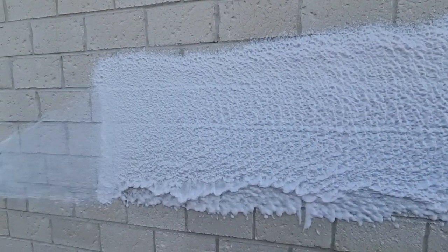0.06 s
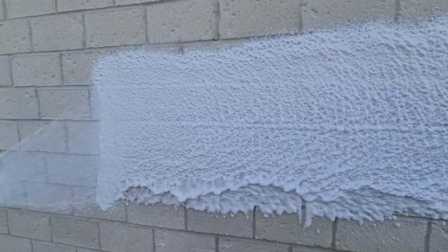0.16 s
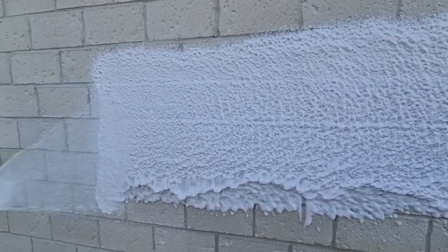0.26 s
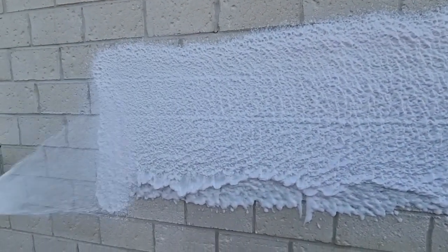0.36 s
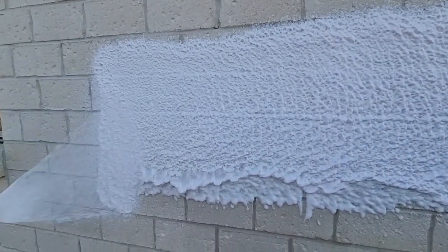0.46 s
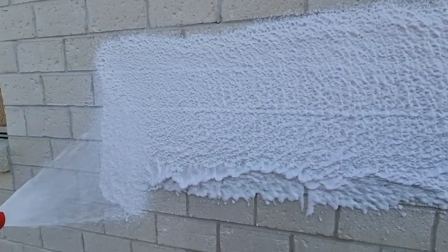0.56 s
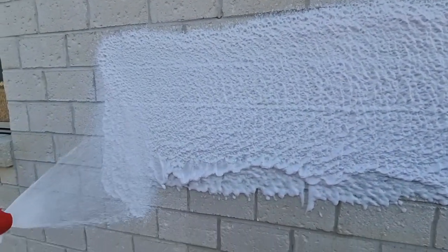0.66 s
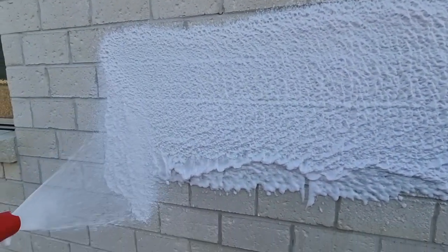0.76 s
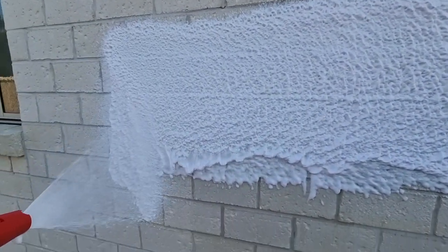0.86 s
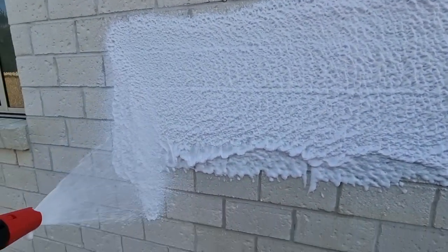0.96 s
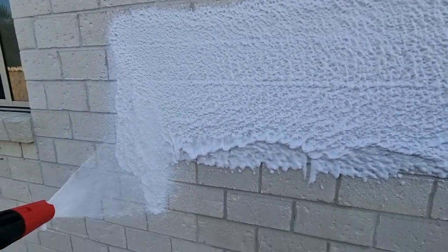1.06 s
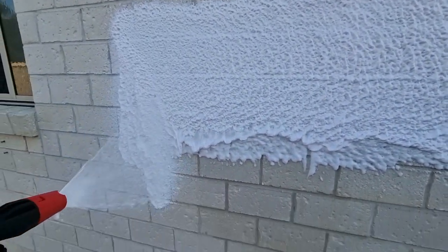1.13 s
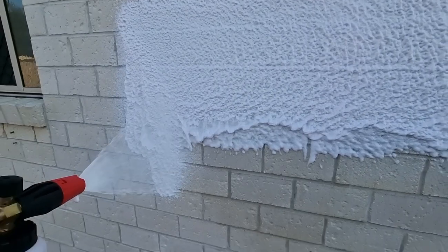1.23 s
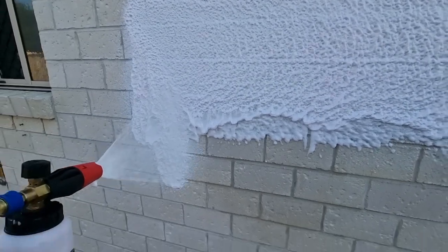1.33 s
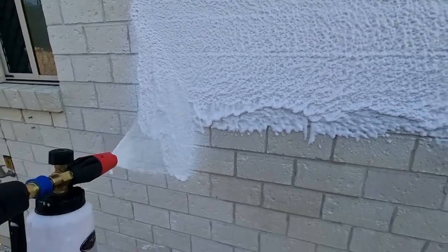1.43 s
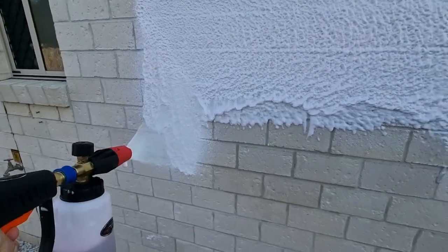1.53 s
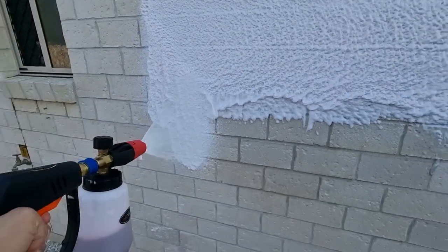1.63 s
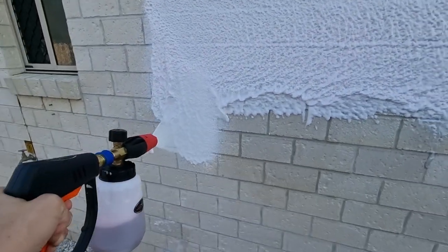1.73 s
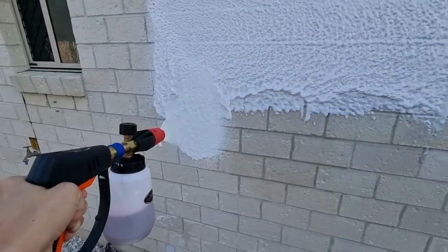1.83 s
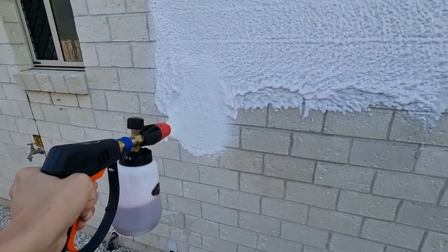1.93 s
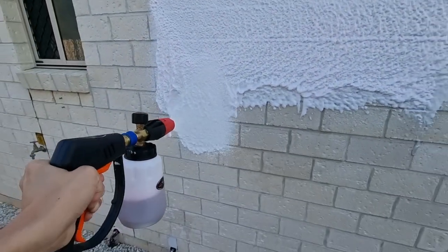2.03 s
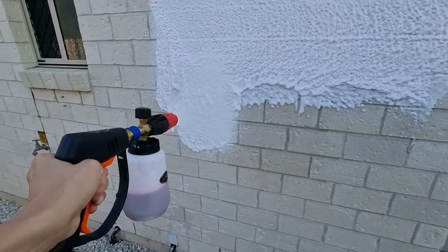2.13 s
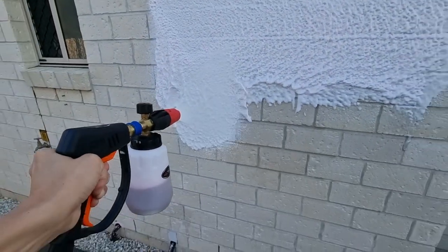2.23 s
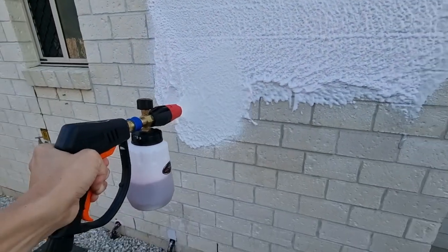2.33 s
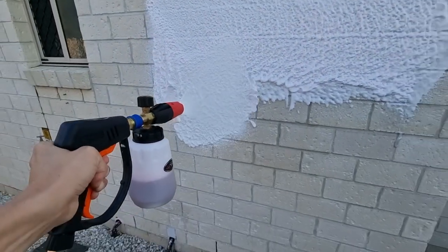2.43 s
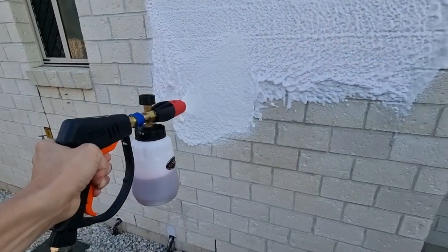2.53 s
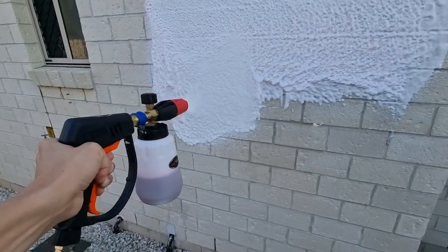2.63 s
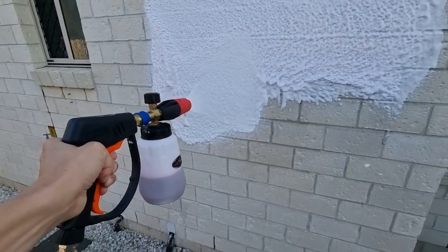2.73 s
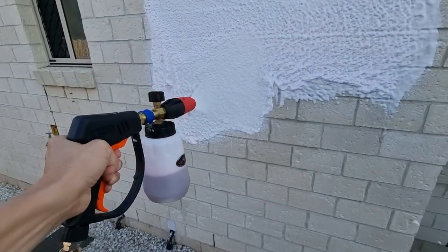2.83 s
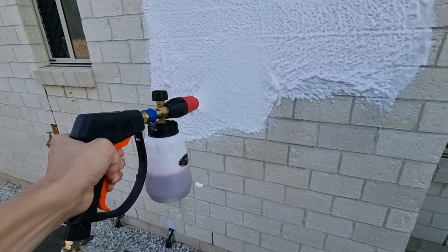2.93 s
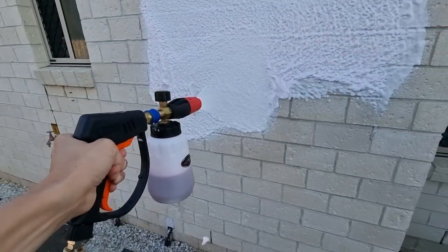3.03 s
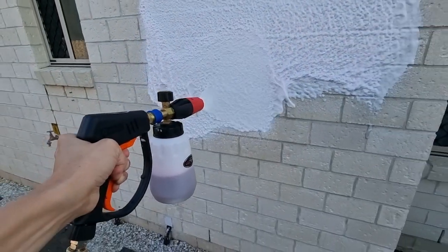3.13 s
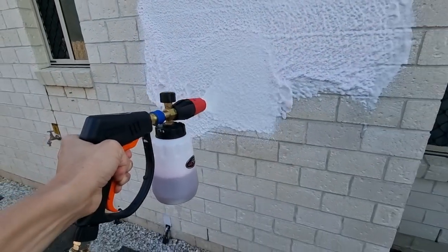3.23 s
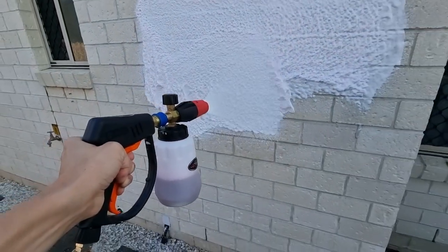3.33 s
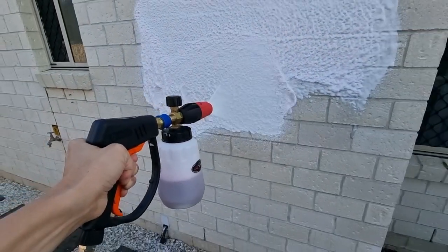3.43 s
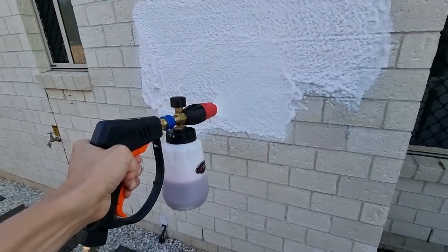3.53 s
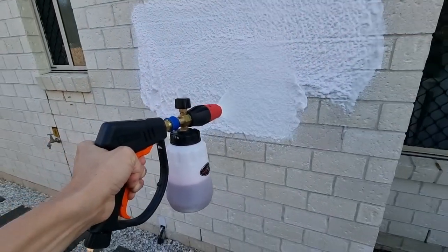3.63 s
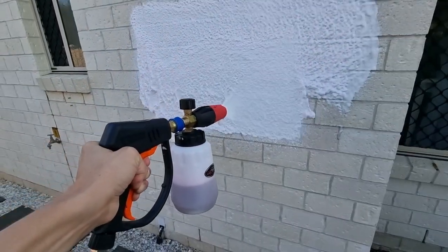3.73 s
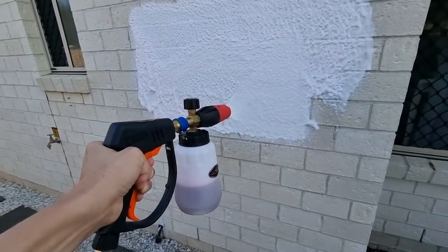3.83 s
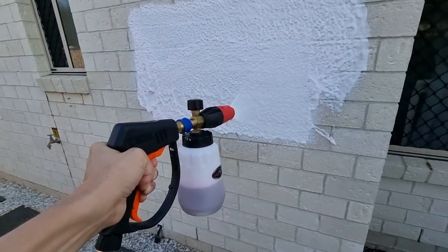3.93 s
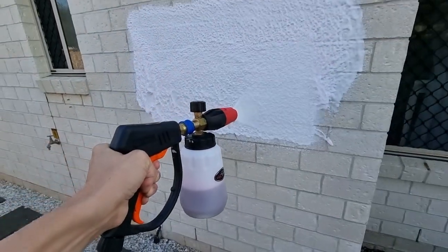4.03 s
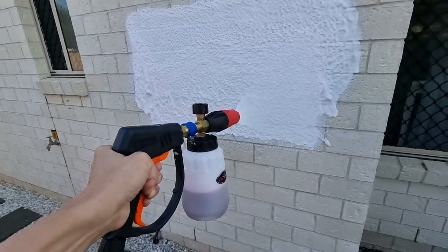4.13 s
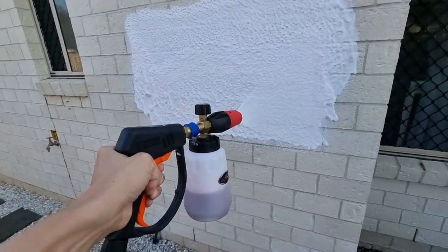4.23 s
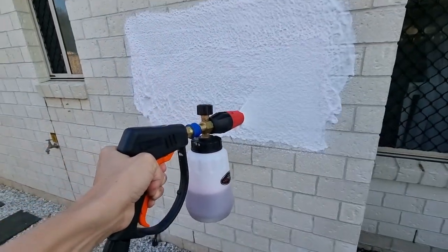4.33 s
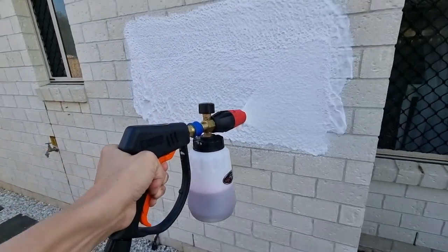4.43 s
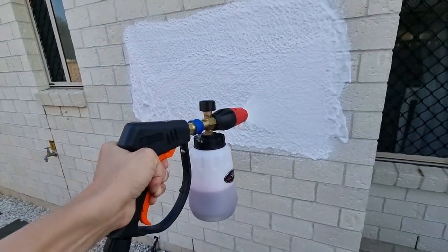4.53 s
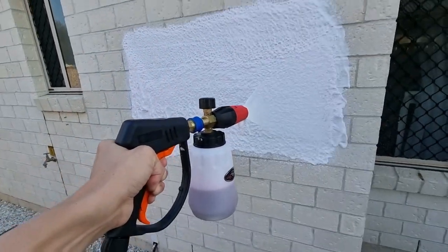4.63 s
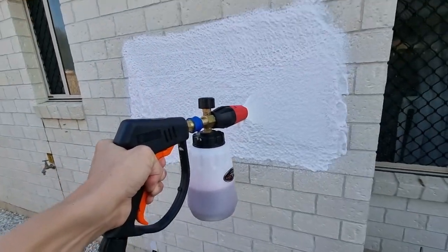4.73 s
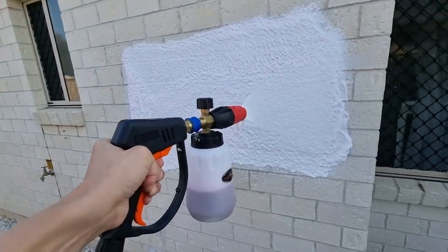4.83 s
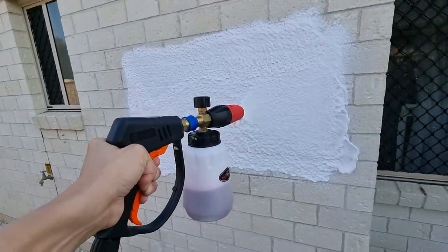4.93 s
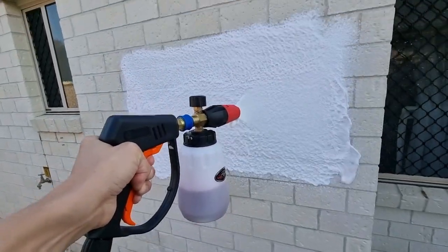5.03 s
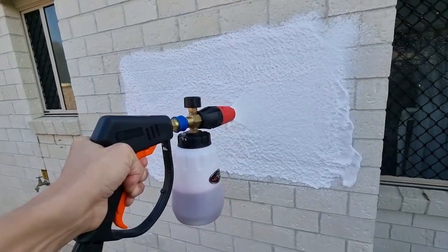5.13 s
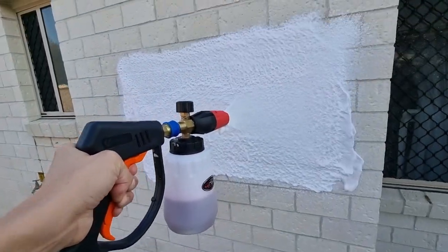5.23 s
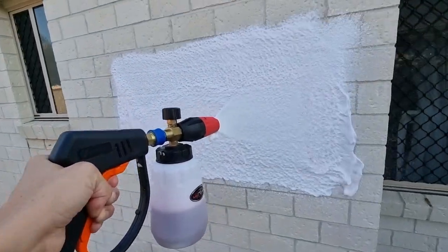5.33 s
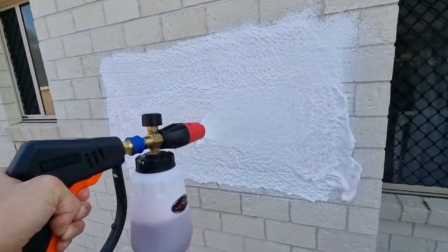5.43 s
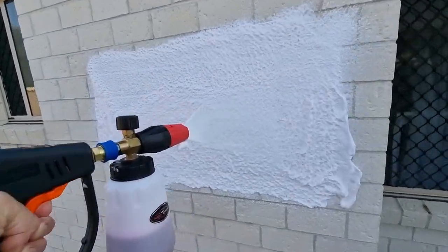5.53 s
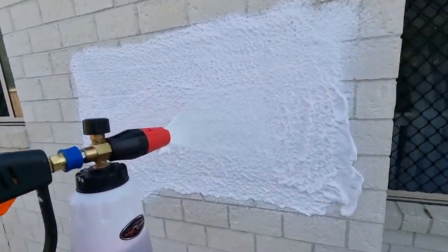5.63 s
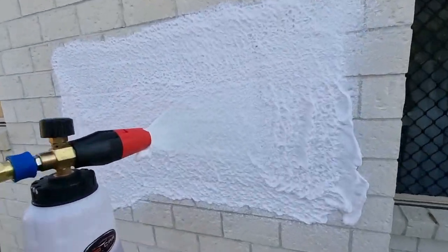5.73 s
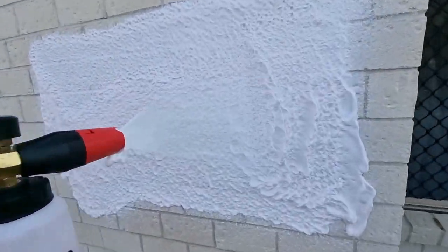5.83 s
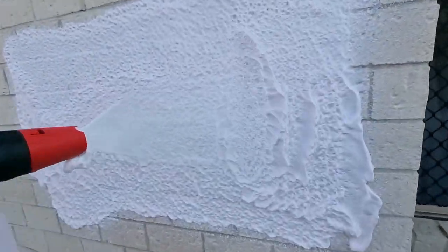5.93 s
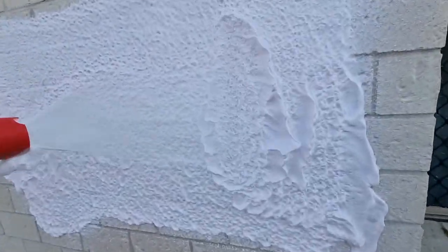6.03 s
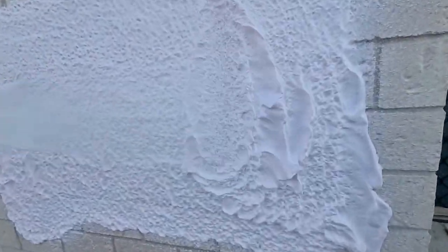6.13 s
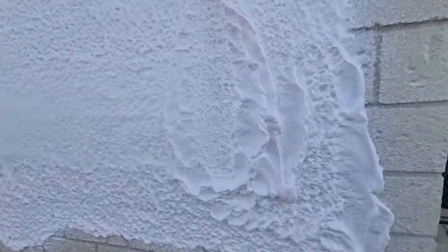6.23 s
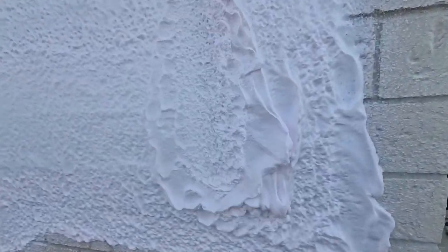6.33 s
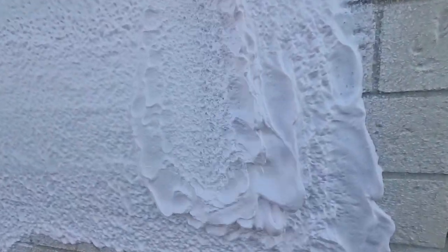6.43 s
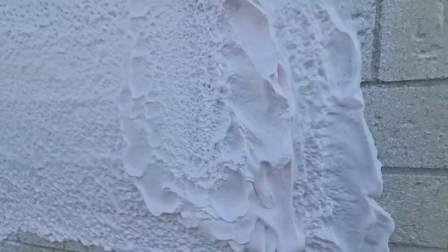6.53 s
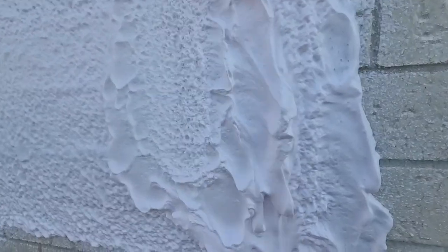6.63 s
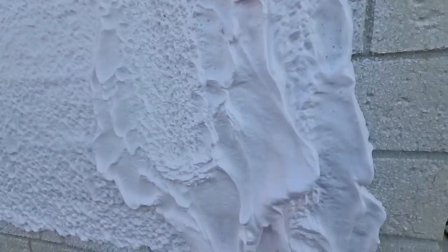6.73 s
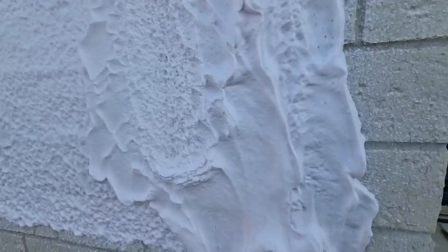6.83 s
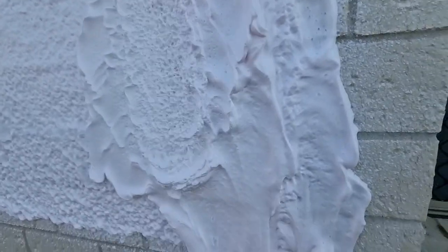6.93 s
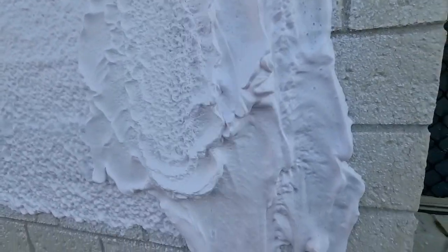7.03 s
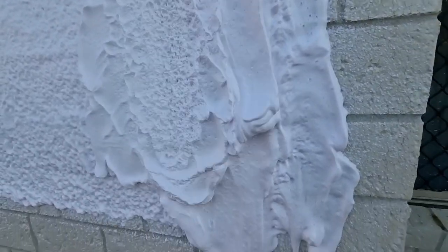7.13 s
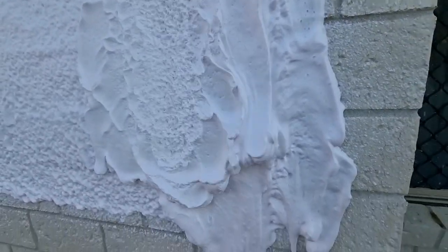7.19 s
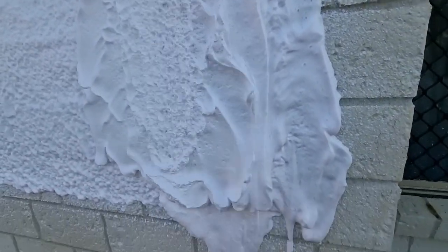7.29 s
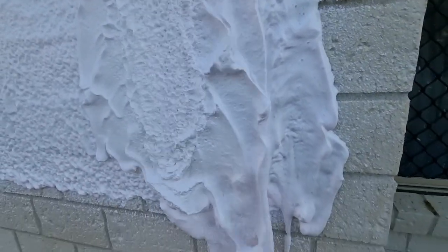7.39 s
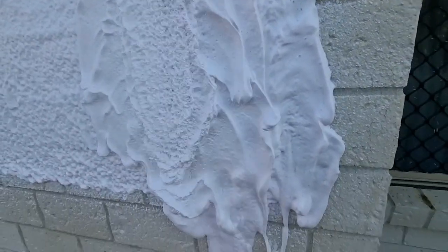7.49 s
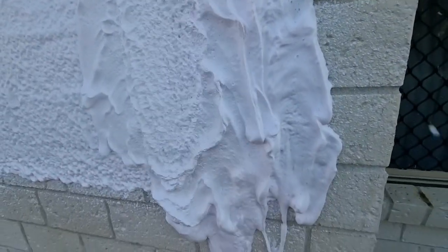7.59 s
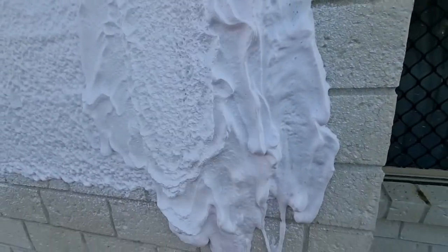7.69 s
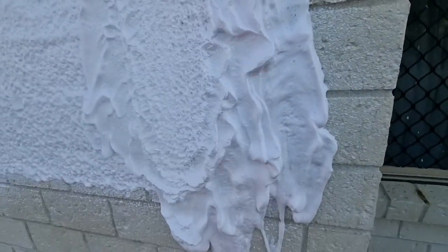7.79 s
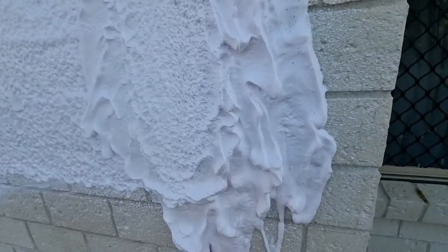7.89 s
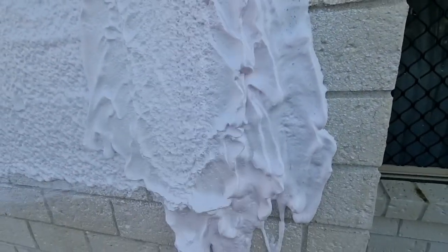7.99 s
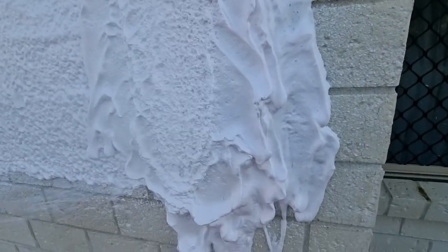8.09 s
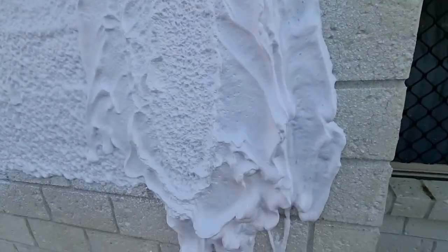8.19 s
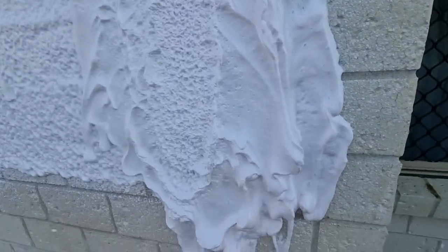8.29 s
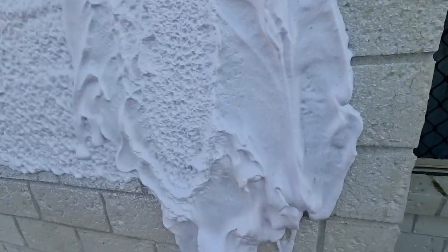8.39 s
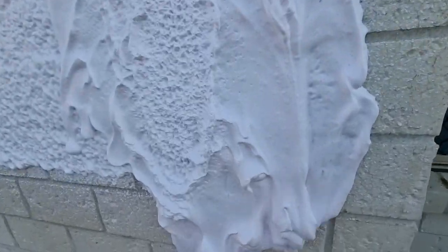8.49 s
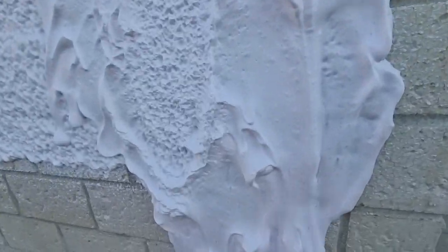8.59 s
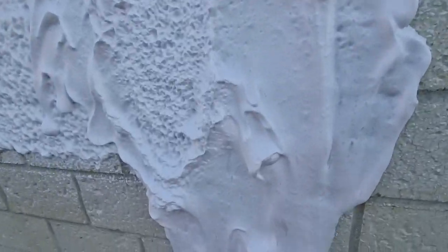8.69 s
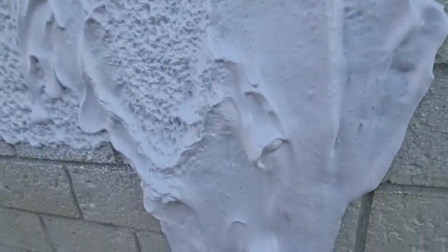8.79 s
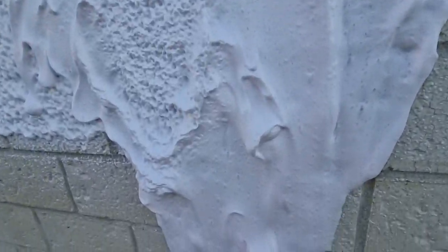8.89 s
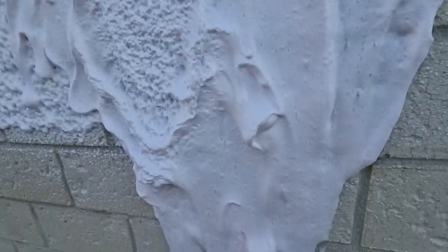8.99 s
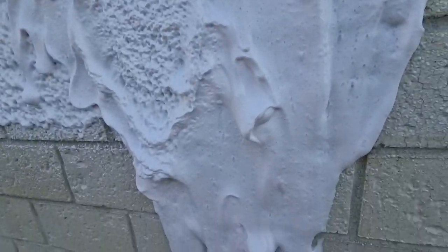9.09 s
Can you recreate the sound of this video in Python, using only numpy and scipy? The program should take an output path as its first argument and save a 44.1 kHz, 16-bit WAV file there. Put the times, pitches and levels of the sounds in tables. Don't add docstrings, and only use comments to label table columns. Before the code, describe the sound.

Close, steady roar and fizz of pressurised foam over a low pump hum stops abruptly, leaving a falling whine, a faint bird call and a click.

```python
import sys
import numpy as np
from scipy import signal
from scipy.fft import rfft, irfft, next_fast_len
from scipy.io import wavfile
from scipy.ndimage import uniform_filter1d, map_coordinates

SR = 44100
rng = np.random.default_rng(int(sys.argv[2]) if len(sys.argv) > 2 else 0)


def ratio_of_db(decibels):
    return 10 ** (np.asarray(decibels, float) / 20)


def persist_wave(psi):
    counts = np.round(np.clip(psi, -1, 1) * 32767).astype(np.int16)
    wavfile.write(sys.argv[1], SR, np.atleast_2d(counts).T)


N = 403515
TIME = np.arange(N) / SR

# (time [s], to the nozzle [dB], to the splash on the wall [dB])
NEARNESS = [(0, 1, -1), (.4, -0.5, 2.5), (.75, 2, 1.5), (1.25, 1, 1), (1.95, -0.5, -1.5), (2.5, -1.5, -1.5),
            (2.85, -2.5, -1), (3.4, -4, -1), (4.3, -2.5, -2), (5.0, -3, 0.5), (5.25, -5.5, -0.5),
            (5.55, -0.5, 3), (5.92, 3.5, 3.5), (6.17, 6.5, 5.5), (6.7, 5.5, 4.5), (7.5, 2.5, 5.5),
            (8.1, 2, 6), (8.26, 4.5, 7.5)]
# (time [s], left lead of the nozzle [samples], left lead of the splash [samples])
BEARING = [(0, 11.5, 6), (.8, 9, 5), (1.5, 5, 2.5), (1.9, 1.5, -2.5), (2.5, -.5, -2), (3.3, -3.5, -3),
           (4, -5, -4), (5, -5, -1), (5.5, -3.5, -2.5), (6, 3, 5), (6.3, 7, 8), (6.9, 10, 7),
           (7.2, 8.5, 8.5), (8.3, 7, 6)]
# (frequency [Hz], density [dB per Hz])
ROAR = [(150, -17.5), (260, -6.5), (350, -5), (430, -2), (600, 0), (900, 1), (1200, 0.5), (1500, 1),
        (1800, 2.5), (2200, -4), (3500, -17)]
# (frequency [Hz], density [dB per Hz])
FIZZ = [(1200, -11.5), (1900, -2.5), (2500, 0.5), (3200, 1), (4400, -2), (5400, -5), (6500, -4.5),
        (8000, -8), (9500, -9.5), (12000, -11)]
# (frequency [Hz], density [dB per Hz])
SIZZLE = [(8000, -16.5), (10300, -20.5), (11500, 1), (12500, 4.5), (14000, 3), (15000, 5), (15900, -0.5)]
# (time [s], lower resonance [Hz], upper resonance [Hz])
HOLLOW = [(0, 546, 1270), (1.22, 537, 1250), (1.34, 730, 1320), (2, 720, 1230), (2.75, 715, 1180),
          (2.95, 860, 1280), (4, 817, 1260), (5.2, 765, 1310), (5.45, 670, 1490), (5.9, 620, 1340),
          (6.15, 540, 1310), (7.2, 665, 1320), (8.3, 556, 1430)]
# (time [s], delay [ms])
WALL_ECHO = [(0, 1.45), (1.5, 1.47), (1.75, 1.27), (2.3, 1.04), (2.6, 1.01), (2.9, 1.09), (4.06, 1.12),
             (4.9, 1.155), (5.5, 1.25), (5.8, 1.46), (6.3, 1.36), (6.7, 1.45), (7.4, 1.41), (8.3, 1.47)]
# (decay t60 [s], echo level [dB], echo t60 [s])
JET_STOP = [
    (.11, -21, .4),
    (.125, -23, .6),
    (.13, -29, .7),
]
SHUT_S = 8.268
ROAR_DB, FIZZ_DB, SIZZLE_DB = -22.5, -19.5, -21.5
FIZZ_BY_NOZZLE, WALL_SHADES_FIZZ = 0.58, 0.056
ECHO_SHARE, ECHO_TOP_HZ = .14, 5000

# (multiple of the stroke rate [1], level [dB rms])
PUMP = [(2, -63.5), (3, -50.5), (4, -44.5), (6, -49)]
# (time [s], level [dB])
WASHER_NEARNESS = [(0, -3), (1.3, 3.5), (2, 2), (4.6, -0.5), (5.6, -4.5), (8.3, -5)]
# (frequency [Hz], width [Hz], level [dB])
SHELL = [(4550, 600, -.5), (5200, 800, -7), (6600, 700, -4)]
# (multiple of the whine [1], level [dB])
COAST_ORDERS = [(1.5, -9), (2, -11)]
PUMP_HZ = 74.1
WHINE_HZ, WHINE_DB = 6645, -46
COAST_LAG_S, COAST_S = .03, .77
COAST_DB, COAST_DB_PER_S = -57, 2

# (time [s], peak level [dB], frequency [Hz], decay t60 [s])
CLICKS = [(8.8976, -15.5, 1600, 0.0048), (8.8976, -26, 3150, 0.0045), (8.8978, -30, 2320, 0.004),
          (8.898, -35, 4200, .004), (8.898, -55, 9000, .004), (8.9005, -40, 1420, .01),
          (8.9045, -38, 1500, .009), (8.9145, -49, 3500, .008), (8.912, -46, 1400, .01),
          (8.34, -46, 12000, 0.0058), (8.328, -48, 9500, .005), (9.121, -58, 9000, .006)]

# (start [s], length [s], top pitch [Hz], peak level [dB rms], place of the peak [0-1])
BIRD = [
    (8.37, .54, 2010, -45.5, .4),
    (8.92, .22, 2290, -49.5, .3),
]
# (multiple of the strongest partial [1], level [dB])
THROAT = [(.5, -18), (1, 0.5), (2, -15)]
SCOOP, SAG = .05, .05
CALL_RISE_DB, CALL_FALL_DB = 8, 13

# (multiple of the cycle rate [1], level [dB rms])
ENGINE = [(3, -53), (4, -50), (5, -49), (8, -50)]
# (time [s], multiple of the cycle rate [1], peak level [dB rms])
SWELLS = [(.05, 6, -35), (.25, 6, -40), (.58, 7, -37), (.88, 6, -43), (1.38, 6, -41), (1.6, 7, -39),
          (1.86, 6, -41), (2.06, 6, -40), (2.55, 6, -40), (2.98, 6, -42), (3.2, 6, -46), (3.68, 6, -37),
          (4.69, 6, -31.5), (5.1, 6, -39), (5.46, 7, -35), (5.8, 6, -36), (6.24, 6, -42), (6.55, 6, -42),
          (6.8, 6, -39), (7.1, 6, -51), (7.52, 6, -43), (7.7, 6, -37), (7.95, 6, -47), (8.24, 6, -40),
          (8.42, 6, -44), (8.57, 6, -38), (8.76, 6, -38.5), (8.97, 6, -33)]
ENGINE_HZ = 12.22
SWELL_S, LULL_DB = 0.071, {6: -45, 7: -49}
# (frequency [Hz], density [dB per Hz])
RUMBLE = [(12, -28), (25, -16), (31, -17), (39, -18), (50, -11), (70, 15.5), (95, -1), (120, 4.5),
          (170, -42)]
# (frequency [Hz], density [dB per Hz])
AIR = [(70, -28), (150, -1.5), (300, -7), (900, -7.5), (1600, -11.5), (3000, -22.5), (7300, -26),
       (9000, -30), (10800, -43), (14000, -38)]
AIR_DB, RUMBLE_DB = -45.5, -43
AIR_FADE_S, AIR_FADE_DB_PER_S = 8.12, 5

# (frequency [Hz], left phase lead [rad], likeness [0-1], L-R [dB])
AHEAD = [(110, .3, .9, 0), (260, .6, .8, 1.5), (480, 1.4, .45, 3.5), (620, .7, .65, 1.5),
         (1200, 1.1, .55, 2.5), (1500, 2.8, .3, 2), (1900, 5.5, .2, 1.5), (2500, 4.2, .3, -1.5),
         (3400, 4.9, .5, -3), (4400, 5.4, .45, -3), (6500, 5.2, .35, 0), (9000, 4, .3, 2),
         (11500, 4.2, .4, -2.5), (15500, 3.8, .35, -4)]
# (frequency [Hz], left phase lead [rad], likeness [0-1], L-R [dB])
BESIDE = [(110, .25, .9, .5), (260, .8, .7, 5), (430, 2.2, .75, 10), (520, 1.8, .85, 12), (640, 1.4, .9, 6),
          (900, 1.9, .92, 2), (1250, 1.7, .92, .5), (1600, 2.4, .65, -3), (2100, 4.2, .45, 1.5),
          (2500, 5.5, .55, 4), (3600, 5.6, .55, -1), (6500, 5.5, .5, 2), (9000, 4.6, .4, 3),
          (11500, 4.3, .35, -1.5)]
TOP_HZ = 15880


def jet():
    nozzle_db, wall_db = curves(NEARNESS, TIME)
    nozzle_lead, splash_lead = curves(BEARING, TIME)
    slugs_db = .5 * wobble(4.4) + 0.49 * wobble(25) + 1.0 * wobble(300)
    slugs_db = slugs_db + 0.11 * np.sin(2 * np.pi * PUMP_HZ * TIME)
    roar_end, fizz_end, sizzle_end = (valve_shut(*row) for row in JET_STOP)

    roar = spray(hollow, splash_lead, ratio_of_db(.5 * slugs_db), .6)
    roar = ratio_of_db(ROAR_DB + wall_db) * roar_end * roar

    fizz_burst = ratio_of_db(0.69 * slugs_db + 0.44 * wobble(12))
    fizz_db = FIZZ_DB + FIZZ_BY_NOZZLE * nozzle_db - WALL_SHADES_FIZZ * wall_db
    fizz = ratio_of_db(fizz_db) * fizz_end * spray(colour(FIZZ), nozzle_lead, fizz_burst, 0.83)

    sizzle_burst = ratio_of_db(0.91 * slugs_db + 0.48 * wobble(6.9))
    sizzle = spray(colour(SIZZLE), nozzle_lead, sizzle_burst, 1.0)
    sizzle = ratio_of_db(SIZZLE_DB + nozzle_db) * sizzle_end * sizzle
    return roar + fizz + sizzle


def valve_shut(t60, echo_db, echo_t60):
    after = np.maximum(TIME - SHUT_S, 0)
    return ratio_of_db(-60 * after / t60) + (after > 0) * ratio_of_db(echo_db - 60 * after / echo_t60)


def spray(gain, lead, burst, patchy_db):
    def combed(hz, t):
        delay_s = curves(WALL_ECHO, t)[0] / 1000
        share = ECHO_SHARE / (1 + (hz / ECHO_TOP_HZ) ** 2)
        return gain(hz, t) * (1 + share * np.exp(-2j * np.pi * hz * delay_s))

    direct, diffuse = (burst * patchy(patchy_db, 1.3) for _ in range(2))
    return unit(ports(direct, combed, lead, diffuse))


def hollow(hz, t):
    low, high = curves(HOLLOW, t)
    rise = hz * hz / np.abs(low * low - hz * hz + .2j * hz * low)
    fall = high * high / np.abs(high * high - hz * hz + .4j * hz * high)
    return colour(ROAR)(hz, t) * np.sqrt((rise ** 2 + 7.3) * (fall ** 2 + .5))


def washer():
    after = np.maximum(TIME - SHUT_S, 0)
    near_db = curves(WASHER_NEARNESS, TIME)[0]
    speed = PUMP_HZ * (1 + 0.0024 * wobble(2.636))
    hum = sum(tone(k * speed, db + near_db + 2.0 * wobble(3.47) - 400 * after) for k, db in PUMP)

    coast = np.maximum(after - COAST_LAG_S, 0)
    unsteady = 1 + .016 * np.minimum(after * 20, 1) * wobble(60)
    hz = WHINE_HZ * np.exp(-coast / COAST_S) * unsteady
    coast_db = COAST_DB - COAST_DB_PER_S * coast
    flutter_db = (1.5 + 1.5 * (after > 0)) * wobble(60)
    through_shell = np.where(coast > 0, shell(hz, 0), ratio_of_db(WHINE_DB - COAST_DB))
    whine = through_shell * tone(hz, coast_db + flutter_db)
    for k, db in COAST_ORDERS:
        whine = whine + shell(k * hz, 0) * tone(k * hz, coast_db + db + 4 * wobble(35))

    rattle = unit(ports(patchy(2.2), shell, np.full(N, 21.), patchy(2.5)))
    rattle = rattle * ratio_of_db(-50.5 - 12 * after)
    return ports(hum + whine, flat, np.full(N, 8.), 0.28 * whine) + rattle


def shell(hz, t):
    rings = sum(ratio_of_db(db) * hz * width / np.abs(centre * centre - hz * hz + 1j * hz * width)
                for centre, width, db in SHELL)
    return rings ** 2 * (hz < 7200)


def trigger():
    ticks = np.zeros(N + SR)
    t = np.arange(SR // 10) / SR
    for start, db, hz, t60 in CLICKS:
        snap = .5 * uniform_filter1d(rng.standard_normal(len(t)), size=3) * ratio_of_db(-60 * t / 0.0091)
        envelope = ratio_of_db(db + 9.0 - 60 * t / t60) * (1 - np.exp(-t / 0.0011))
        ticks[round(start * SR):][:len(t)] += envelope * (np.sin(2 * np.pi * hz * t) + snap)
    ticks = ticks[:N]
    return ports(ticks, flat, np.full(N, -9.), .5 * np.roll(ticks, 40))


def bird():
    calls = np.zeros(N)
    for start, length, top_hz, peak_db, place in BIRD:
        u = np.clip((TIME - start) / length, 0, 1)
        inside = uniform_filter1d(1. * (u > 0) * (u < 1), size=2000)
        bend = 1 - SCOOP * np.exp(-u * length / .025) - SAG * u ** 2
        hz = top_hz * bend * (1 + .012 * wobble(90))
        db = peak_db - CALL_RISE_DB * np.maximum(1 - u / place, 0)
        db = db - CALL_FALL_DB * np.maximum(u - place, 0) / (1 - place)
        for k, partial_db in THROAT:
            hoarse_db = 1.5 * wobble(14) + 2.5 * wobble(90)
            calls += inside * tone(k * hz, db + partial_db + hoarse_db)
    lead = np.interp(TIME, [8.45, 8.75], [-18, -10])
    return ports(calls, flat, lead, 0.78 * np.roll(calls, 2000))


def engine():
    def order(k, db):
        return tone(k * ENGINE_HZ + 1.5 * wobble(5), db)

    drone = sum(order(k, db + 4 * wobble(3)) for k, db in ENGINE)
    for k, lull_db in LULL_DB.items():
        level = ratio_of_db(lull_db)
        for centre, multiple, db in SWELLS:
            if multiple == k:
                level = level + ratio_of_db(db) * np.exp(-((TIME - centre) / SWELL_S) ** 2 / 2)
        drone = drone + level * order(k, 0.87 * wobble(18.0))
    return drone


def surroundings():
    shared, own = filtered(rng.standard_normal((2, N)), colour(RUMBLE))
    rumble = unit(np.array([shared + 0.61 * own, shared - 0.45 * own]))
    rumble = ratio_of_db(RUMBLE_DB) * ratio_of_db(2.9 * wobble(1.84)) * rumble
    air = unit(ports(patchy(1.4), colour(AIR), np.full(N, 5.), patchy(0.6)))
    air = air * ratio_of_db(-AIR_FADE_DB_PER_S * np.maximum(TIME - AIR_FADE_S, 0))
    return engine() * ratio_of_db([[.3], [-.3]]) + rumble + ratio_of_db(AIR_DB + 4.5) * air


def ports(sound, gain, lead, diffuse):
    hz, t, (z, twin) = signal.stft(np.array([sound, diffuse]), SR, nperseg=1024)
    lead = np.interp(t, TIME, lead)
    beside = np.clip((lead + 4) / 12, 0, 1)
    phase, alike, pan_db = (a[:, None] + beside * (b - a)[:, None]
                            for a, b in zip(along(AHEAD, hz), along(BESIDE, hz)))
    hz = hz[:, None]
    turn = np.arccos(np.clip(alike, 0, 1)) / 2
    half = ratio_of_db(pan_db / 2) * np.exp(.5j * (phase + 2 * np.pi * hz * lead / SR))
    coloured = gain(hz, t)
    z = coloured * np.cos(turn) * z
    twin = coloured * np.sin(turn) * twin
    both = np.array([(z + twin) * half, (z - twin) / half])
    return signal.istft(both, SR, nperseg=1024)[1][:, :N]


def patchy(depth_db, ripple_db=0):
    z = signal.stft(rng.standard_normal(N), nperseg=512)[2]

    def blur(bins, frames):
        smooth = uniform_filter1d(rng.standard_normal(z.shape), size=bins, axis=0)
        return unit(uniform_filter1d(smooth, size=frames, axis=1))

    gain = ratio_of_db(depth_db * blur(6, 12) + ripple_db * blur(2, 220))
    return signal.istft(z * gain, nperseg=512)[1][:N]


def tone(hz, db):
    phase = 2 * np.pi * np.cumsum(hz) / SR + rng.uniform(0, 2 * np.pi)
    return np.sqrt(2) * ratio_of_db(db) * np.sin(phase)


def wobble(rate):
    return map_coordinates(rng.standard_normal(int(N * rate / SR) + 4), [TIME * rate])


def colour(spectrum):
    return lambda hz, t: ratio_of_db(along(spectrum, hz)[0])


def flat(hz, t):
    return np.ones_like(hz)


def filtered(x, gain):
    m = next_fast_len(N + 8192)
    return irfft(rfft(x, m) * gain(np.fft.rfftfreq(m, 1 / SR), 0), m)[..., :N]


def along(points, hz):
    f, *cols = np.transpose(points)
    return [np.interp(np.log(hz + 1), np.log(f + 1), c) for c in cols]


def curves(rows, t):
    s, *cols = np.transpose(rows)
    return [np.interp(t, s, c) for c in cols]


def unit(x):
    return x / np.sqrt(np.mean(x ** 2) + 1e-20)


def scene():
    return jet() + washer() + trigger() + bird() + surroundings()


def low_pass(x):
    return signal.sosfilt(signal.butter(12, 15880, fs=SR, output="sos"), x)


def record(dry):
    soft = dry / (1 + np.abs(dry / .95) ** 6) ** (1 / 6)
    narrow = filtered(soft, lambda hz, t: hz < TOP_HZ)
    return low_pass(narrow)


dry = scene()
out = record(dry)
persist_wave(out)
```